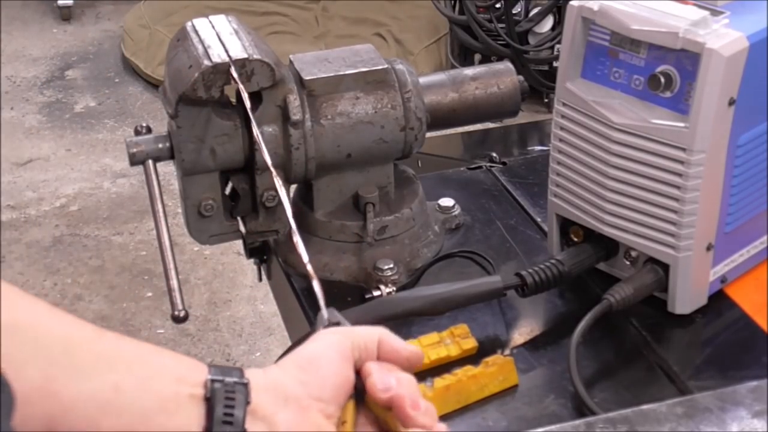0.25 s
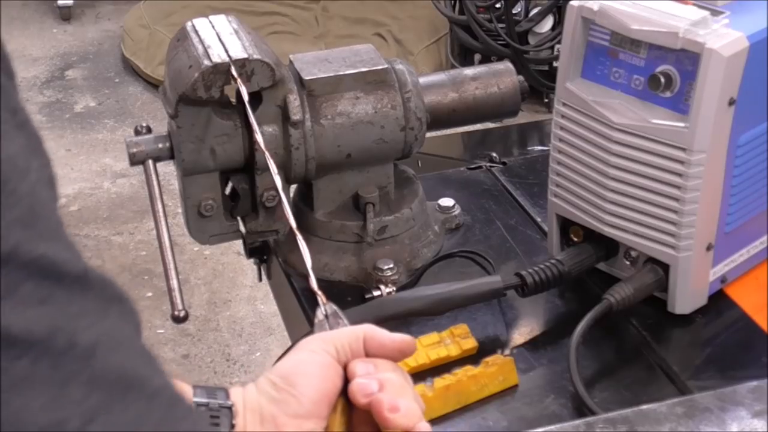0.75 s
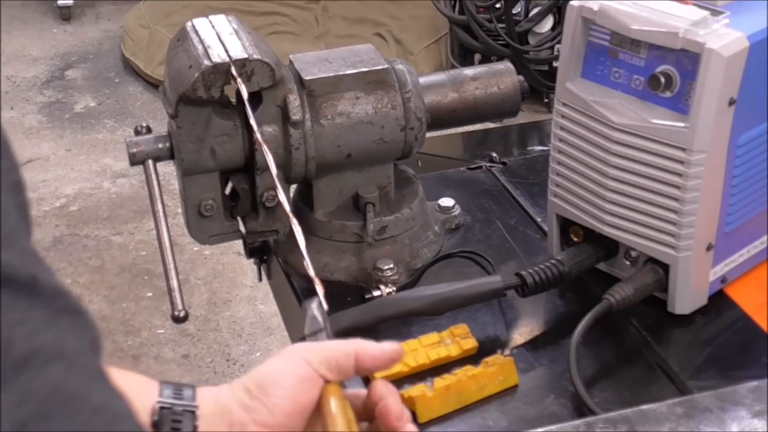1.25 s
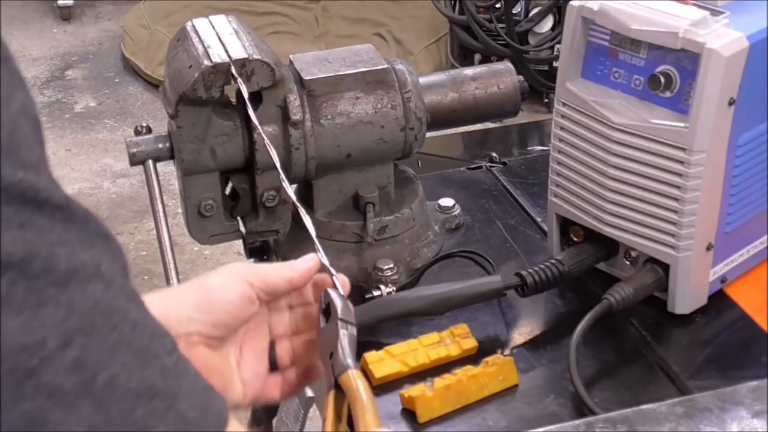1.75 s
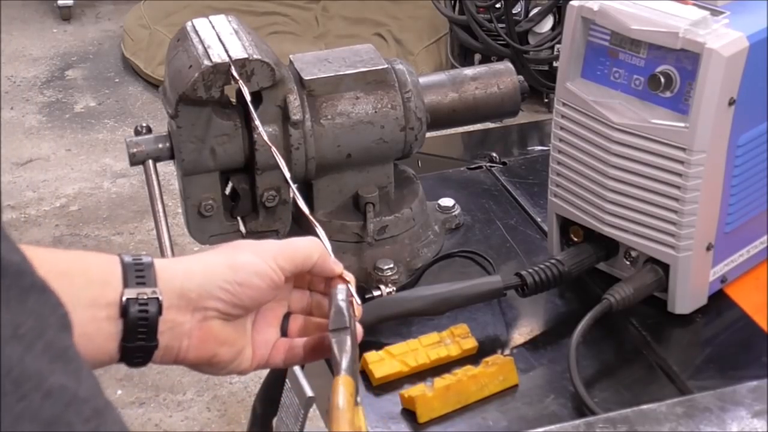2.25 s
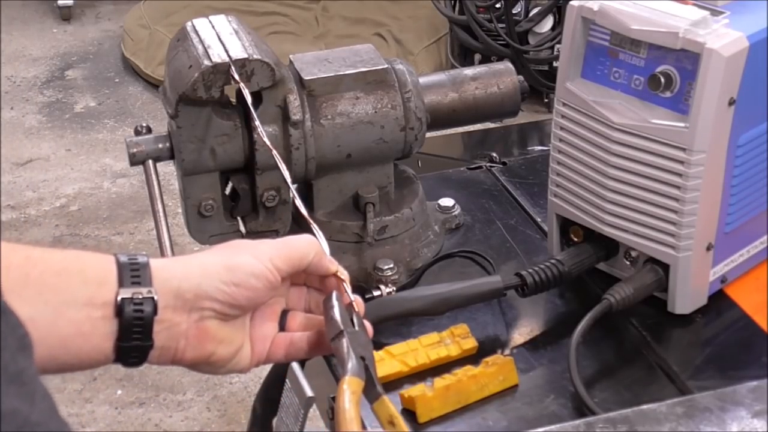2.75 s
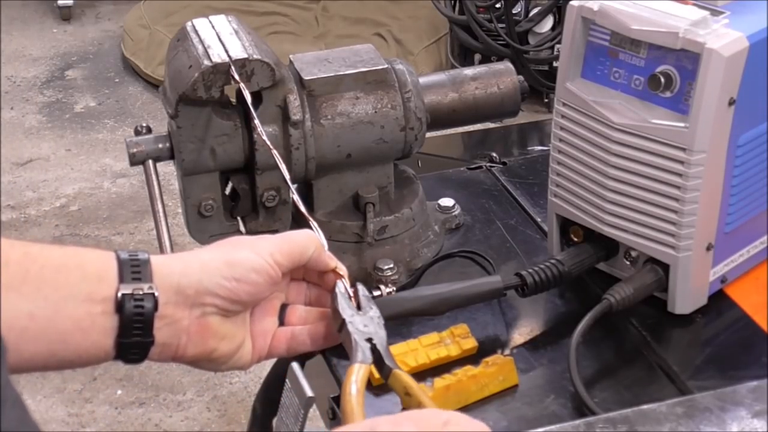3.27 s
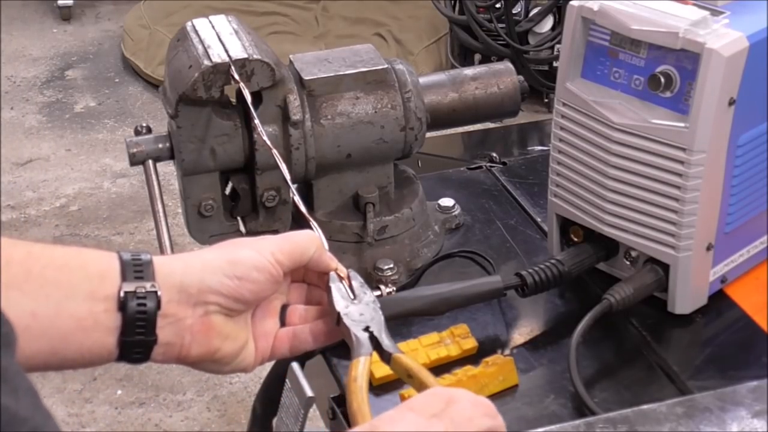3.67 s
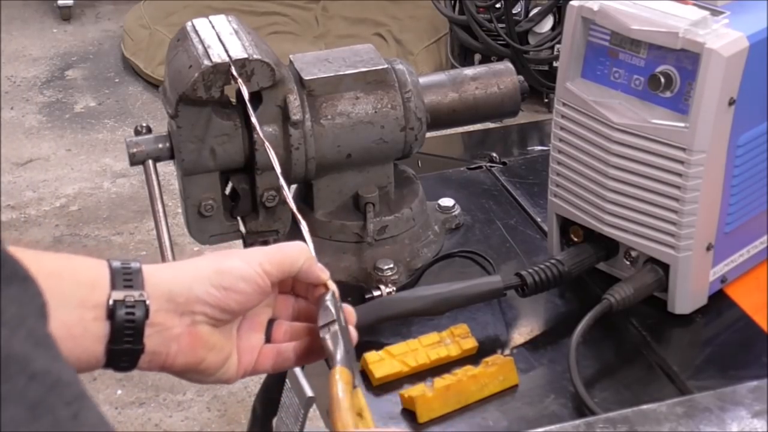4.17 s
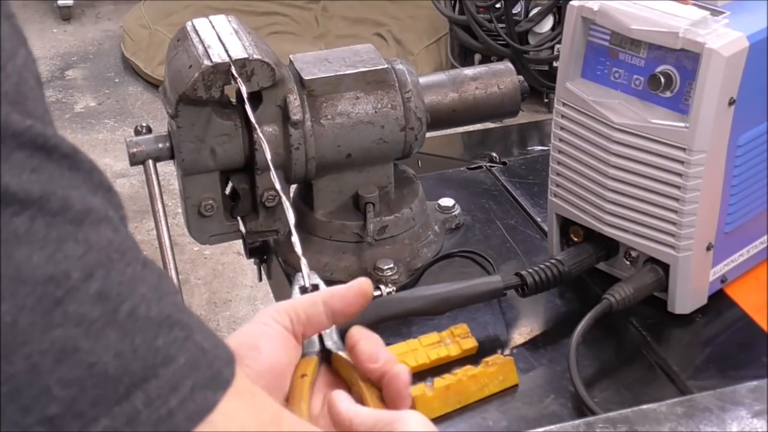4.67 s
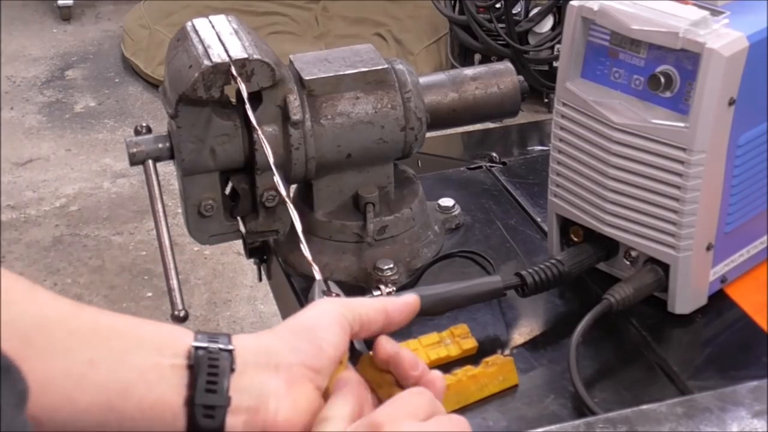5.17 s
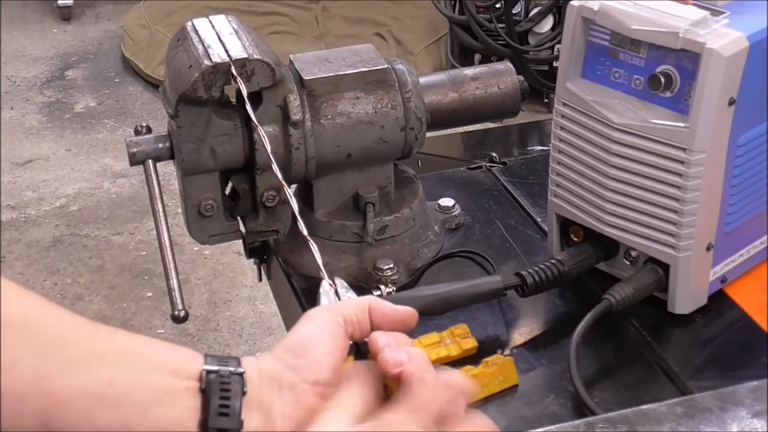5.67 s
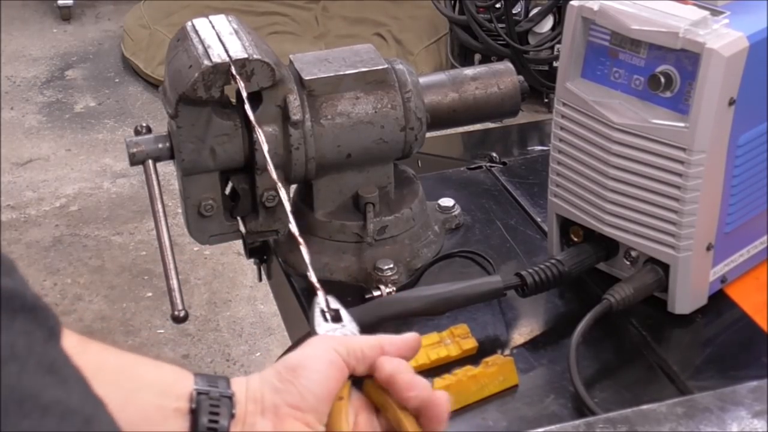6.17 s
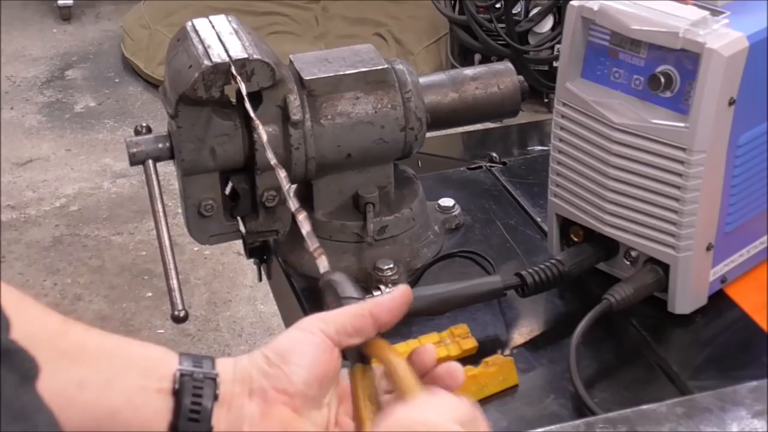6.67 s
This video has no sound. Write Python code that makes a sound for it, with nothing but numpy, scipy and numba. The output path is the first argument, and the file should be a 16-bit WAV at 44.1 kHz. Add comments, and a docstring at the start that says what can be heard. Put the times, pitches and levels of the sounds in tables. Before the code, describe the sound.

Small, dry hand-tool sounds near the microphone: steel jaws ticking on wire, short gritty scrapes, low creaks from the grips, dull palm thuds and hissy skin and cloth strokes. One hard metallic crack near the start towers over everything and rings briefly through vise and room. Underneath lie still air, weak low hum and steady hiss.

```python
"""A workbench in a quiet workshop, heard close up by a stereo microphone.
Pliers twist two strands of copper wire in a bench vise: each tug rings the modes of vise and bench.
The jaws tick as short ringing cracks, scrape as grainy noise and once clack shut.
Hand and sleeve rub as swelling noise, the grips creak as slips through a gliding resonance and thud
as brief sines; behind them lie still air, a weak hum, a low drone and steady hiss."""
import sys
import numpy as np
from scipy import signal
from scipy.fft import rfft, irfft, next_fast_len
from scipy.io import wavfile
from numba import njit

SR = 44100
rng = np.random.default_rng(int(sys.argv[2]) if len(sys.argv) > 2 else 0)


def wav_out(sig):
    """Save sig, one row per channel (or a flat mono array), as 16-bit PCM at SR to the path in sys.argv[1]."""
    wavfile.write(sys.argv[1], SR, np.round(np.clip(np.atleast_2d(sig).T, -1, 1) * 32767).astype(np.int16))


N = 305172
T = np.arange(N) / SR
TOP_HZ = 15850  # upper edge of the sound at the microphone


def undb(db):
    """Decibels to gain."""
    return 10 ** (np.asarray(db) / 20)


def unit(x):
    """Scale to rms 1."""
    return x / np.sqrt(np.mean(x ** 2))


def at(points, hz):
    """Read (frequency [Hz], value) points on a log-frequency axis."""
    f, value = np.transpose(points)
    return np.interp(np.log(np.maximum(hz, 1)), np.log(f), value)


def freqs(n):
    """Frequencies of a spectrum of n samples."""
    return np.arange(n // 2 + 1) * SR / n


def colour(x, points):
    """Give a sound a spectrum, keeping the power of white noise."""
    n = next_fast_len(x.shape[-1])
    gain = unit(undb(at(points, freqs(n))))
    return irfft(rfft(x, n) * gain, n)[..., :x.shape[-1]]


def impulse(points, tilt_db=0, spread_s=0, size=1024):
    """Causal click of unit energy; its delay grows with frequency, reaching spread_s at TOP_HZ."""
    hz = freqs(size)
    octaves = np.log2(np.maximum(hz, 1000) / 6000)
    cepstrum = irfft(np.log(undb(at(points, hz) + tilt_db * octaves)))
    # folding the cepstrum forward gives minimum phase
    cepstrum[1:size // 2] *= 2
    cepstrum[size // 2 + 1:] = 0
    delay_phase = np.pi * spread_s * hz ** 2 / TOP_HZ
    return unit(irfft(np.exp(rfft(cepstrum) - 1j * delay_phase))) / np.sqrt(size)


# Width of a diffuse field at the microphone, before wide_db: (frequency [Hz], side minus mid [dB])
WIDTH = [(50, -7), (130, -7), (280, -10), (1200, -10), (3000, -12), (5500, -12), (8000, -7), (15000, -10)]


def stereo(pair, wide_db=0):
    """Two unrelated sounds become mid and side of a diffuse field."""
    n = next_fast_len(pair.shape[1])
    side_gain = undb(at(WIDTH, freqs(n)) + wide_db)
    side = irfft(rfft(pair[1], n) * side_gain, n)[:pair.shape[1]]
    return np.array([pair[0] + side, pair[0] - side])


def add(out, s, sound):
    """Mix a sound in at a time."""
    i = max(int(s * SR), 0)
    out[:, i:i + sound.shape[-1]] += sound[..., :max(N - i, 0)]


def ring(modes, scatter_db=0, size=SR):
    """Decaying modes of total power 1; shares may scatter, phases differ a little between the ports."""
    t = T[:size]
    hz, db, t60 = np.transpose(modes)[:, :, None]
    db = db + scatter_db * rng.standard_normal(db.shape)
    waves = undb(db - 60 * t / t60) * np.exp(2j * np.pi * hz * t)
    phase = 2 * np.pi * rng.random(len(modes)) + rng.uniform(-.7, .7, (2, len(modes)))
    return (np.exp(1j * phase) @ waves).imag / np.sqrt(np.sum(undb(db) ** 2) / 2)


# Reverberation of the workshop, before each sound's stretch: (frequency [Hz], 60 dB decay [s])
ROOM_T60 = [(200, 0.93), (1200, 0.37), (3600, 0.58), (6000, 0.4), (10000, 0.12), (15000, .24)]


def tail(points, stretch, count=9):
    """Dense ringing that starts near rms 1; each band dies at its own stretched room rate."""
    t, hz = T[:SR], freqs(SR)
    noise = rfft(stereo(colour(rng.standard_normal((2, SR)), points)))
    out = 0
    centres = np.geomspace(200, 15000, count)
    for centre, row in zip(centres, np.eye(count)):
        band = np.interp(hz, centres, row)  # triangle around this centre
        t60 = stretch * at(ROOM_T60, centre)
        out = out + irfft(noise * band) * undb(-60 * t / t60)
    return out


def friction(points, rate, scatter_db, smooth, wide_db=0):
    """Tiny slips of scattered size over smooth sliding noise; rate is slips per second."""
    happens = rng.random((2, N)) < rate / SR
    size = undb(scatter_db * np.clip(rng.standard_normal((2, N)), -2, 2))
    slips = happens * rng.standard_normal((2, N)) * size
    sliding = smooth * rng.standard_normal((2, N))
    return unit(stereo(colour(unit(slips) + sliding, points), wide_db))


@njit
def resonate(x, hz, width):
    """Band-pass whose centre moves; width in Hz."""
    y, b, l = np.empty(len(x)), 0., 0.  # output, band and low states
    for i in range(len(x)):
        g, k = np.tan(np.pi * hz[i] / SR), width / hz[i]
        v = (b + g * (x[i] - l)) / (1 + g * (g + k))
        b, l, y[i] = 2 * v - b, l + 2 * g * v, k * v
    return y


def flutter(hz):
    """Slow chance of spread 1, changing up to about hz times a second."""
    return unit(colour(rng.standard_normal(N), [(hz, 0), (hz * 8, -90)]))


def swell(peak_s, rise_s, fall_s):
    """Envelope of one movement: it grows to 1 at its peak, then dies away."""
    before = (peak_s - T) / max(rise_s, 1e-3)
    after = (T - peak_s) / max(fall_s, 1e-3)
    return np.exp(-np.maximum(before, after))


# Tugs that knock vise and bench, before the layer gains:
# (time [s], level [dB], build-up constant [s], ring of the vise [dB], buzz of the wire [dB])
KNOCKS = [(.021, -57, 0.0035, -3, -23), (.301, -67, 0.0018, -14, -1), (.503, -33.5, 0.0034, 3, -53),
          (.557, -37.5, 0.0025, -20, -20), (.66, -35, 0.032, -6, -13), (.795, -49.5, 0.0024, -12, -22),
          (.822, -49, 0.0024, -10, -27.5), (1.081, -55, 0.0057, 0, -8), (1.161, -60.5, 0.0031, -14, -9),
          (1.851, -58.5, 0.0047, -1, -1.5), (2.002, -45, 0.0032, -5, -11.5),
          (2.195, -56.5, 0.0041, -4, -4.5), (2.327, -58, .005, -12, -0.5), (2.724, -54, 0.021, -7, -1.5),
          (2.975, -56, 0.0092, -4.5, -5.5), (3.108, -54.5, 0.022, -6.5, -12.5),
          (3.278, -50.5, 0.022, -8, -4), (3.376, -59.5, 0.008, -4.5, -1), (3.574, -59, 0.013, 0.5, -24),
          (3.847, -50, 0.0075, -11.5, -13.5), (4.84, -65.5, 0.0017, 3.5, -2),
          (5.558, -67.5, 0.0036, 3, -20), (6.02, -63.5, 0.0031, -1.5, -11),
          (6.125, -61, 0.013, -15.5, 10.5), (6.342, -58, 0.0053, -23.5, 2), (6.703, -77, 0.0028, 16, -10.5)]
# Modes of vise and bench: (frequency [Hz], relative level [dB], 60 dB decay [s])
VISE = [(248.4, -11.5, 1.0), (416.8, 1.5, 0.33), (526, -1.5, 0.9), (554, -6.5, 1), (730.5, 3, 0.33),
        (820, -14.5, 0.29), (936, -13, .5), (1082, -7, .45), (1093, -7.5, .6), (1125, -2, .55),
        (1212, -5, .5), (1343, -13.5, .7), (1460, -11.5, .6), (1674, -17, 0.34)]
# Spectra of the bench's dense ring and the strands' buzz: (frequency [Hz], relative level [dB per Hz])
BENCH = [(40, -28.5), (150, -19.5), (250, -5), (520, 0.5), (630, -7.5), (740, -3.5), (1150, 0), (1560, -7),
         (1750, -19.5), (2600, -25.5), (5000, -41)]
BUZZ = [(500, -19.5), (1200, 1.5), (2100, 0.5), (2600, -4.5), (3100, -4.5), (4200, -5), (5200, -0.5),
        (6500, -17.5), (15000, -29)]


def knocks(bench_db=-3, vise_db=0, strands_db=-5):
    """The wire tugs the vise: its modes, the dense ring of the bench and the strands' buzz build up and fade."""
    out, modes = np.zeros((2, N)), ring(VISE)
    benches = [tail(BENCH, stretch=0.81) for _ in range(5)]
    buzzes = [tail(BUZZ, stretch=0.66) for _ in range(3)]
    for k, (s, db, rise, ring_db, buzz_db) in enumerate(KNOCKS):
        onset = 1 - np.exp(-T[:SR] / max(rise, 1e-4))
        bench = undb(bench_db) * benches[k % len(benches)]
        vise = undb(ring_db + vise_db) * modes
        strands = undb(buzz_db + strands_db) * buzzes[k % len(buzzes)]
        add(out, s, undb(db) * onset * (bench + vise + strands))
    return out


# Spectra of the clack and of its tail: (frequency [Hz], relative level [dB per Hz])
CLACK = [(150, -34), (600, -10.5), (1300, -7.5), (1900, -32), (2800, -16), (3700, -1), (4500, -8),
         (5600, -7), (6600, -21), (8500, -8.5), (11800, -20.5), (13000, -15.5), (15500, -24.5)]
CLACK_TAIL = [(300, -24), (1200, 2.5), (2100, -6), (2700, -17.5), (3300, -3.5), (3750, 0), (4400, -12.5),
              (5000, -5.5), (5900, -9.5), (6800, -13.5), (8500, -6), (11000, -9), (12500, -22.5),
              (15500, -29)]
# Modes of the taut wire: (frequency [Hz], relative level [dB], 60 dB decay [s])
WIRE = [(1879, -15, 0.4), (2196, -11, .24), (3214, -6, .32), (3557, -2.5, .36), (3706, -3.5, .26),
        (3470, -1, 0.12), (4650, -9, .26), (5722, -9.5, 0.3), (5900, -9, .3), (8824, -9, 0.2)]


def clack(s=.5567, db=5.0, tail_db=-37, early_db=-34, wire_db=-45, echo_db=-17, echo_s=0.0061):
    """The jaws slip and slam shut; the bench mirrors the crack, then wire and workshop ring."""
    out, t = np.zeros((2, N)), T[:SR]
    add(out, s, undb(db) * impulse(CLACK, spread_s=.0014))
    add(out, s + echo_s, undb(db + echo_db) * impulse(TICK, spread_s=0.0014))
    chatter = stereo(colour(rng.standard_normal((2, SR)), CLACK)) * np.exp(-t / .002)
    # nearby tools scatter the crack before the far walls answer
    early = stereo(colour(rng.standard_normal((2, SR)), CLACK_TAIL)) * np.exp(-t / .014)
    late = tail(CLACK_TAIL, stretch=0.94)
    add(out, s + 0.00087, undb(-22.5) * chatter + undb(early_db) * early + undb(tail_db) * late)
    add(out, s, undb(wire_db) * ring(WIRE))
    return out


# Steel jaws ticking on the wire, before the layer gains:
# (time [s], level [dB], brightness [dB per octave], ring of the jaws [dB])
TICKS = [(.0205, -51, 3, -1), (0.3014, -51, -7.5, -22), (0.5035, -31.5, 2.5, 2), (0.783, -55.5, -2.5, -1),
         (0.882, -51.5, 4, -13), (1.2309, -49.5, 0, -12), (1.8529, -55.5, -3, -7), (2, -49.5, -2, 6.5),
         (2.006, -45.5, 10.5, -25), (2.3224, -56.5, 7, 13.5), (2.734, -53.5, 0.5, 4),
         (2.9833, -58.5, 0, -6), (3.11, -56, 3, -5), (3.265, -61, -4.5, -1), (3.312, -54, -2, -4),
         (3.377, -60, -6, 4), (3.6133, -51, -4.5, -8), (3.6474, -57, -3, -1.5), (3.828, -56.5, 6, -7),
         (3.8594, -54, -0.5, -2.5), (4.2328, -56.5, -4, -3), (4.84, -50, -7.5, -1), (4.9055, -44, -2, -15),
         (5.5587, -50, 4.5, -17), (5.9888, -53, 3, -16), (6.3446, -47, 1.5, -8), (6.669, -48, -3.5, -9.5),
         (6.701, -56.5, 12, 1), (6.8717, -54, -3.5, -11)]
# Spectrum of a tick, also of the clack's echo: (frequency [Hz], relative level [dB per Hz])
TICK = [(200, -16.5), (1200, 1), (2600, -5), (4200, 6.5), (5200, 4), (8500, 3.5), (11000, 2),
        (15500, -10.5)]
# Modes of the free jaws, for ticks and scrapes: (frequency [Hz], relative level [dB], 60 dB decay [s])
JAWS = [(4780, 2.5, 0.083), (5060, -1, .11), (5140, -4.5, .1), (5530, -9.5, .1), (6100, -13, 0.036),
        (7840, -7, .08), (7900, -1, 0.14), (8170, -5, .1), (9310, -6.5, 0.055)]


def ticks(detune=0.0081):
    """Each tick is a short crack, the ring of the jaws and a little room; their opening shifts the pitch."""
    out, room = np.zeros((2, N)), tail(TICK, stretch=0.96)
    for s, db, tilt_db, ring_db in TICKS:
        jaws = np.array(JAWS) * [1 + detune * rng.standard_normal(), 1, 1]
        add(out, s, undb(db + 18.5) * impulse(TICK, tilt_db, spread_s=0.00053))
        # scattered shares: the point of contact varies
        add(out, s, undb(db + ring_db - 9.5) * ring(jaws, scatter_db=4.5, size=SR // 5))
        add(out, s, undb(db - 18.0) * room)
    return out


# Wire sliding in the jaws, before the layer gains:
# (time of the middle [s], Gaussian half length [s], level [dB], ring of the jaws [dB])
SCRAPES = [(0.536, 0.03, -41, -21), (1.26, 0.062, -55.5, -11), (2.327, 0.017, -59.5, -3.5),
           (2.365, 0.011, -60, -2), (2.732, 0.023, -58, -16), (2.98, 0.02, -57.5, -14),
           (3.276, 0.014, -52.5, -15), (3.382, 0.0087, -51, -13), (3.84, 0.024, -71, -17),
           (5.119, 0.016, -56.5, -11.5), (6.147, 0.029, -52, -19), (6.295, 0.0093, -59, -11.5),
           (6.348, 0.013, -50, -19), (6.394, 0.0085, -42, -11)]
# Spectrum of the slips: (frequency [Hz], relative level [dB per Hz])
SCRAPE = [(200, -17.5), (1300, -5), (2100, -3), (2700, -16), (4100, 5), (5200, 6.5), (6500, -7.5),
          (8300, 2.5), (11000, -7.5), (15500, -12)]


def scrapes(damping=0.27):
    """Copper sticks and slips over the serrated jaws; they ring, damped by the pressed wire."""
    slips = friction(SCRAPE, rate=1900, scatter_db=1.5, smooth=0.19)
    pressed = ring(np.array(JAWS) * [1, 1, damping], size=SR // 5)
    sung = unit(signal.fftconvolve(slips, pressed, axes=1)[:, :N])
    out = 0
    for s, half, db, ring_db in SCRAPES:
        pressure = undb(db) * np.exp(-.5 * ((T - s) / half) ** 2)
        out = out + pressure * (undb(-11.5) * slips + undb(ring_db - 5.5) * sung)
    return out


# The grips slipping in the palm with a dull thud: (time [s], frequency [Hz], level [dB])
THUDS = [(.517, 420, -49), (0.528, 406, -33.5), (.926, 524, -70), (1.512, 295.5, -56), (2.017, 273, -48),
         (3.051, 304, -67), (3.936, 298, -57.5), (4.841, 480, -52), (5.294, 395, -47.5), (5.33, 405, -48.5),
         (5.349, 362, -59), (5.56, 421, -54), (6.02, 458, -52), (6.362, 406, -45.5), (6.707, 417, -56),
         (6.765, 384, -63)]


def thuds(rise_s=.006):
    """A soft slip swells over a few cycles and the palm damps it at once."""
    out, t = np.zeros((2, N)), T[:SR // 8]
    envelope = t / rise_s * np.exp(1 - t / rise_s)
    for s, hz, db in THUDS:
        add(out, s, undb(db) * envelope * np.sin(2 * np.pi * hz * t))
    return out


# Squeezes of the grips, one for each push of the wrist, before the layer gains:
# (time of the peak [s], build-up constant [s], creak level [dB], resonance of the grips [Hz])
SQUEEZES = [(0.044, 0.022, -50, 420), (0.481, 0.057, -54, 448.4), (1.101, 0.037, -60.5, 326.3),
            (1.26, .05, -60.5, 319), (1.461, 0.031, -58, 311.5), (1.582, 0.058, -57.5, 280),
            (3.08, 0.24, -63, 303), (3.35, .08, -64.5, 313.3), (3.96, .02, -61, 289.8),
            (4.135, .012, -64, 284), (4.58, 0.094, -66.5, 390), (4.859, 0.086, -55.5, 458),
            (5.324, 0.054, -48.5, 405), (5.48, 0.027, -55.5, 360), (5.58, 0.075, -56, 411),
            (5.69, 0.022, -59, 390), (5.83, 0.012, -68.5, 393), (6.024, 0.051, -58, 441.6),
            (6.21, 0.077, -55.5, 450), (6.373, 0.024, -54.5, 409), (6.717, 0.067, -52, 412),
            (6.89, 0.12, -58, 430)]
# Spectrum of the creak's slips: (frequency [Hz], relative level [dB per Hz])
GRIP = [(25, -37), (80, -20), (170, -7.5), (270, 2.5), (420, -1.5), (550, -3), (700, -3), (1000, -11),
        (1350, -6.5), (1900, -17.5), (4000, -25.5)]
RELAX_S = 0.066  # time constant of the creak dying away as the palm lets go


def creaking(grip_width_hz=70, slips_db=-8.5, groan_db=-1):
    """The loaded grips creak in low, uneven slips; their resonance glides from squeeze to squeeze."""
    load = np.sqrt(sum((undb(db) * swell(s, rise, RELAX_S)) ** 2 for s, rise, db, _ in SQUEEZES))
    times, _, _, pitches = np.transpose(SQUEEZES)
    hz = np.interp(T, times, pitches)
    slips = friction(GRIP, rate=400, scatter_db=2.5, smooth=1.0, wide_db=2.5)
    groan = unit(np.array([resonate(port, hz, float(grip_width_hz)) for port in slips]))
    return load * (undb(slips_db) * slips + undb(groan_db) * groan)


# Strokes of skin and cloth as the hand turns and regrips, and one brief hiss that goes with the scrape at 2.33
# s: # (time of the peak [s], swell constant [s], fade constant [s], level [dB])
STROKES = [(.045, 0.029, 0.14, -57.5), (.205, 0.016, 0.013, -60), (.49, 0.077, 0.04, -52.5),
           (0.874, 0.062, 0.12, -57), (1.16, 0.01, 0.01, -62.5), (1.245, 0.083, 0.16, -58.5),
           (1.42, 0.048, 0.058, -62), (1.98, 0.07, 0.085, -61), (2.33, 0.011, .014, -58),
           (2.736, .005, 0.027, -64.5), (3.0, .04, 0.11, -70), (3.12, 0.0063, .04, -65),
           (3.301, 0.071, .08, -69), (3.85, 0.025, 0.015, -65.5), (4.03, 0.075, 0.056, -67.5),
           (4.159, 0.027, 0.043, -59), (4.57, 0.046, .04, -64), (4.744, 0.062, 0.063, -61),
           (4.913, 0.014, 0.033, -51.5), (5.125, 0.045, 0.031, -51), (5.37, 0.21, 0.039, -59),
           (5.51, 0.084, 0.019, -58.5), (5.691, 0.065, 0.041, -56.5), (5.88, 0.055, .06, -70),
           (6.02, 0.049, 0.07, -61), (6.224, 0.24, 0.016, -56), (6.33, 0.059, .03, -65.5),
           (6.395, 0.016, 0.034, -51), (6.565, 0.06, .02, -59.5), (6.71, 0.075, 0.14, -55.5),
           (6.86, 0.078, 0.02, -61.5)]
# Spectrum of the rubbing: (frequency [Hz], relative level [dB per Hz])
SKIN = [(200, -17), (700, -19.5), (1400, -3), (2600, -9.5), (4500, 0.5), (6300, -2), (8500, 5.5),
        (10500, 3.5), (12500, 0.5), (15500, -2)]


def rubbing(catch_db=1.5):
    """Skin and cloth hiss finely and catch; overlapping strokes add in power."""
    skin = friction(SKIN, rate=1800, scatter_db=-3.0, smooth=.9, wide_db=-2.5)
    catching = undb(catch_db * flutter(45))
    power = sum((undb(db) * swell(s, rise, fall)) ** 2 for s, rise, fall, db in STROKES)
    return skin * catching * np.sqrt(power)


# The sleeve brushes past once as the arm draws back: (frequency [Hz], relative level [dB per Hz])
SLEEVE = [(500, -9), (1500, -8), (2400, -3.5), (3600, 1.5), (4800, -7.5), (7000, -18.5), (15000, -24.5)]


def sleeve(s=1.495, rise_s=0.039, fall_s=.04, db=-61):
    """One soft, dull swish of cloth."""
    cloth = friction(SLEEVE, rate=1200, scatter_db=-2.0, smooth=.8)
    return undb(db) * swell(s, rise_s, fall_s) * cloth


def surfaces(x, echo_db=-9, count=7):
    """Bench, vise and arm return a few close echoes, a little differently to each port."""
    out = x.copy()
    delays_s = rng.uniform(0.0018, 0.013, count)
    signs = rng.choice([-1, 1], count)
    skews = rng.normal(0, 0.28, count)
    for delay_s, sign, skew in zip(delays_s, signs, skews):
        ports = np.array([[1 + skew], [1 - skew]])
        add(out, delay_s, sign * undb(echo_db) / np.sqrt(count) * ports * x)
    return out


# Spectrum of the workshop air: (frequency [Hz], relative level [dB per Hz])
SHOP = [(15, -59), (25, -30.5), (113, -17), (148, -16), (246, -5), (322, -14), (457, -11.5), (703, -18.5),
        (804, -15), (945, -17), (2170, -27.5), (3720, -31), (6210, -33.5), (8130, -25), (15500, -29)]
# Workshop hum, before its waver: (frequency [Hz], level [dB])
HUM = [(60, -90), (120, -82), (1350, -85)]


def workshop(air_db=-63.5, drone_hz=248, drone_db=-75, waver_db=1.53, hiss_from_hz=4000):
    """Still air, a weak hum and a low drone waver a little; the microphone hiss above them stays steady."""
    air = undb(air_db) * unit(stereo(colour(rng.standard_normal((2, N)), SHOP), wide_db=8.0))
    low = signal.sosfiltfilt(signal.butter(2, hiss_from_hz, fs=SR, output="sos"), air)
    hiss = air - low
    hz = np.full(N, float(drone_hz))
    drone = unit(resonate(resonate(rng.standard_normal(N), hz, 30.), hz, 30.))
    hum = sum(undb(db) * unit(np.sin(2 * np.pi * f * T)) for f, db in HUM)
    waver = undb(waver_db * flutter(5))
    return waver * (low + undb(drone_db) * drone + hum) + hiss


def scene():
    """Vise, pliers and hand at the bench, over the still workshop."""
    close = ticks() + scrapes() + creaking() + rubbing() + sleeve()
    return knocks() + clack() + thuds() + surfaces(close) + workshop()


def record(dry, balance_db=-0.5, drive=1.1):
    """The right port is slightly louder; strong peaks are rounded and the top is cut steeply."""
    ports = undb(np.array([[balance_db], [-balance_db]]) / 2)
    rounded = np.tanh(drive * ports * dry) / drive
    return signal.sosfilt(signal.ellip(10, .2, 70, TOP_HZ, fs=SR, output="sos"), rounded)


dry = scene()
out = record(dry)
wav_out(out)
```